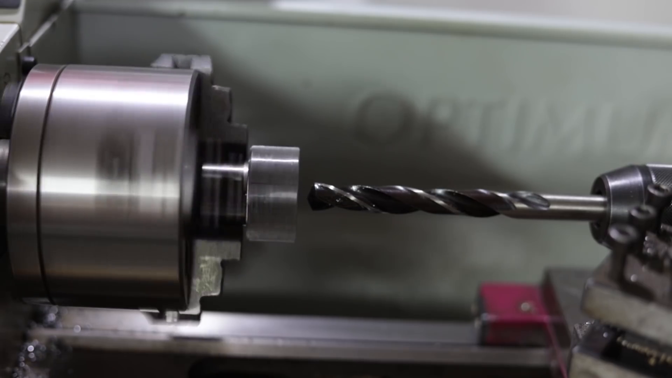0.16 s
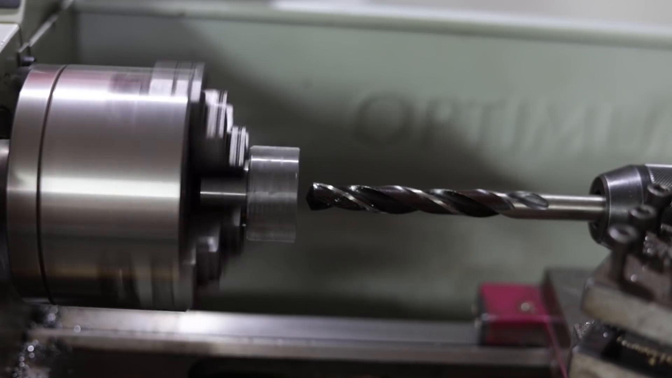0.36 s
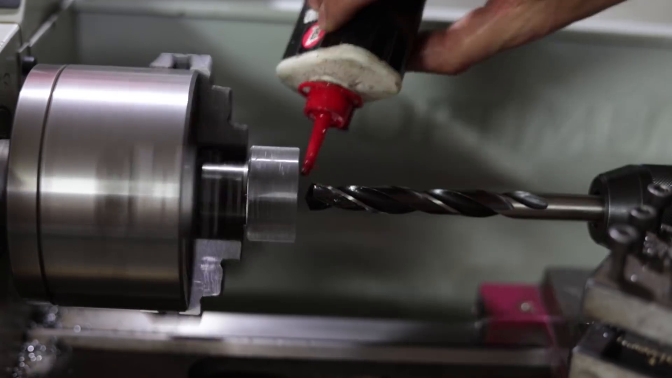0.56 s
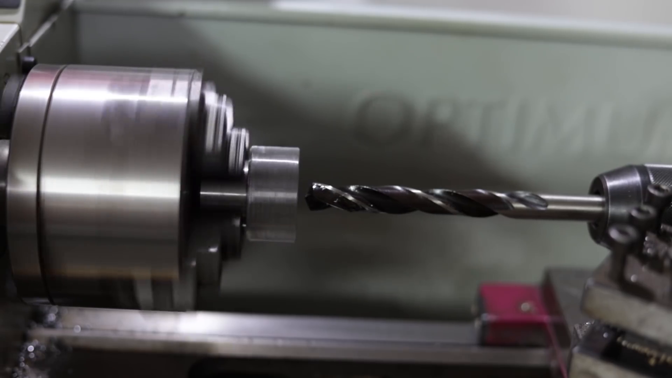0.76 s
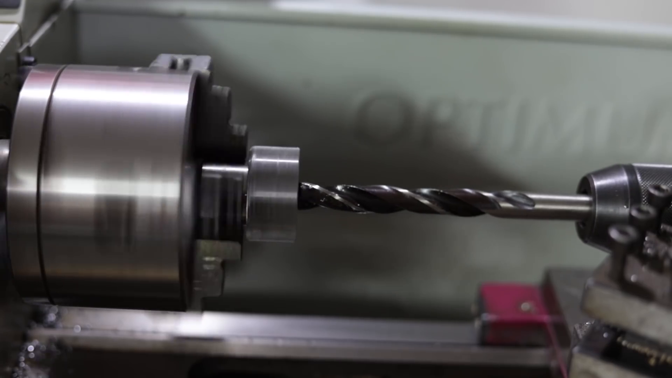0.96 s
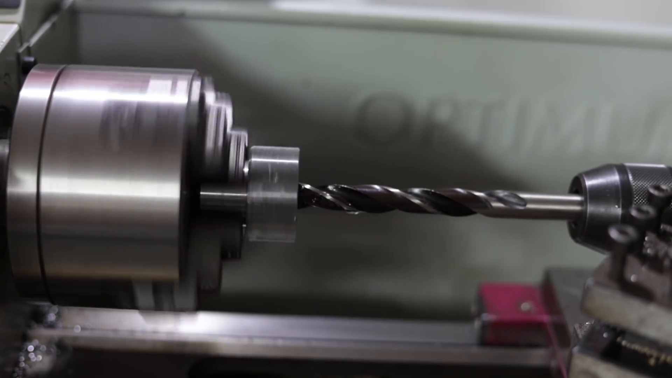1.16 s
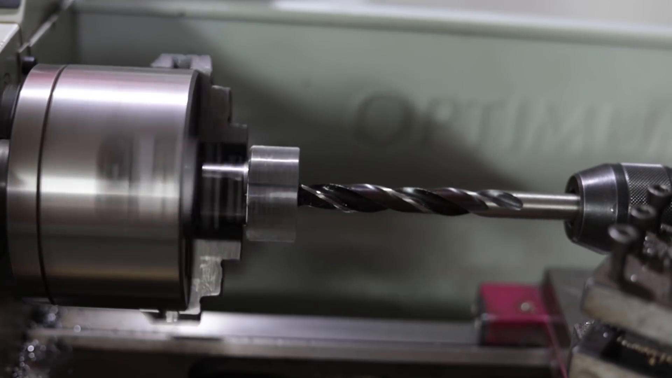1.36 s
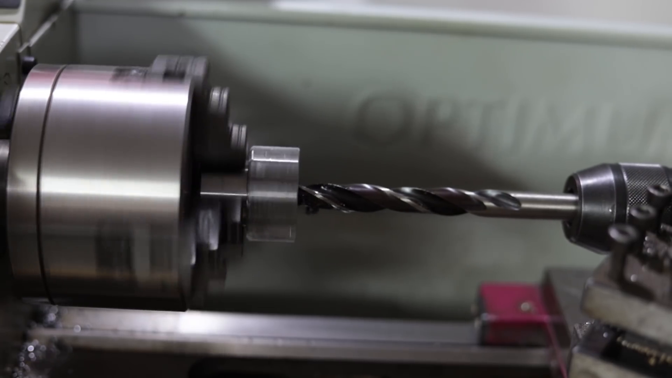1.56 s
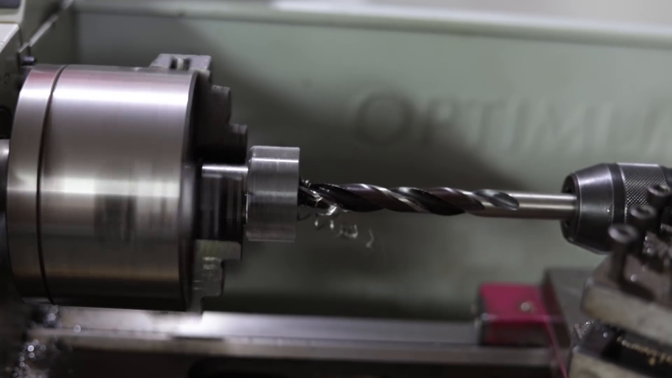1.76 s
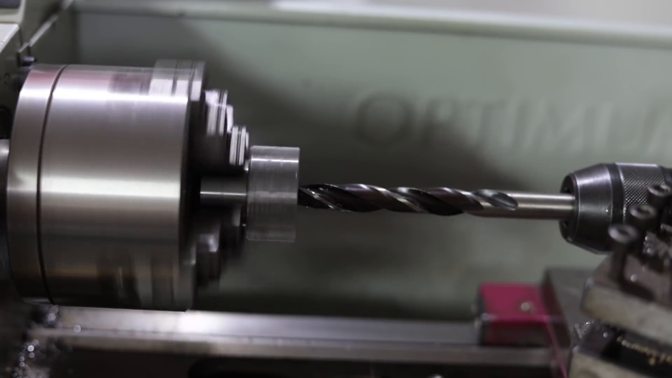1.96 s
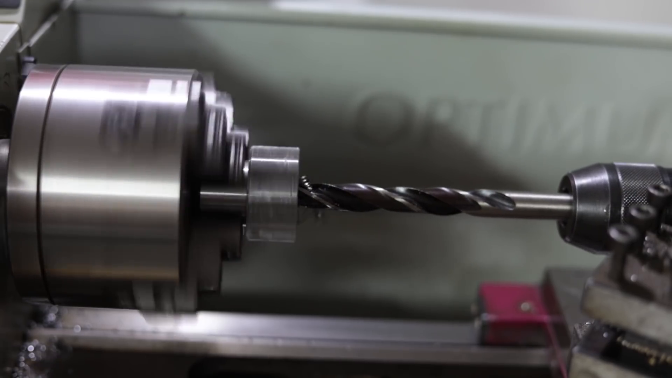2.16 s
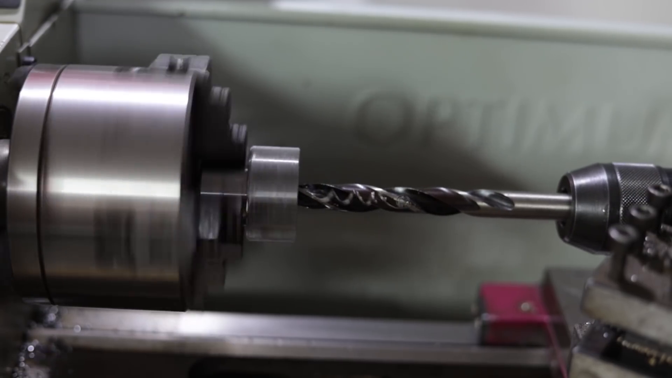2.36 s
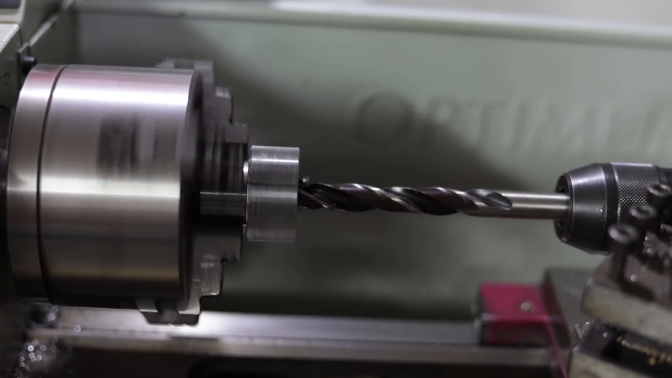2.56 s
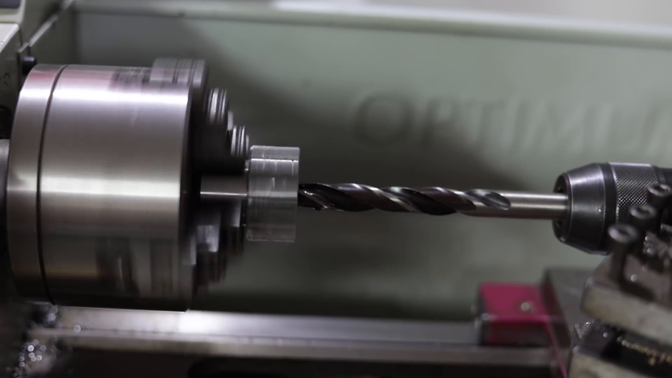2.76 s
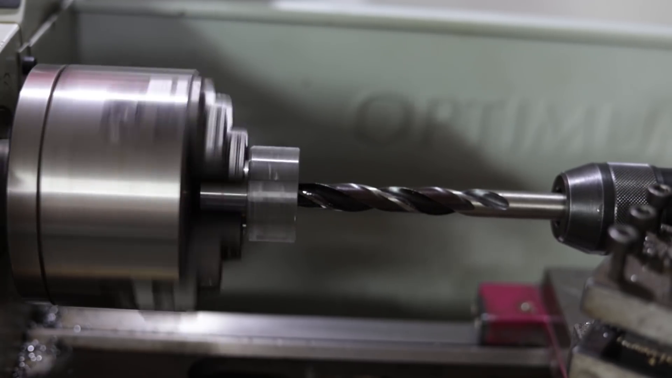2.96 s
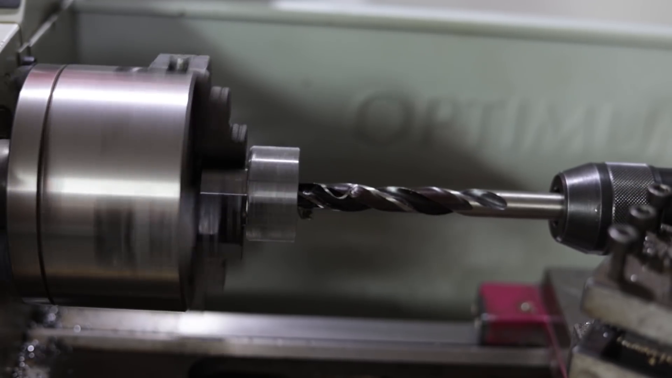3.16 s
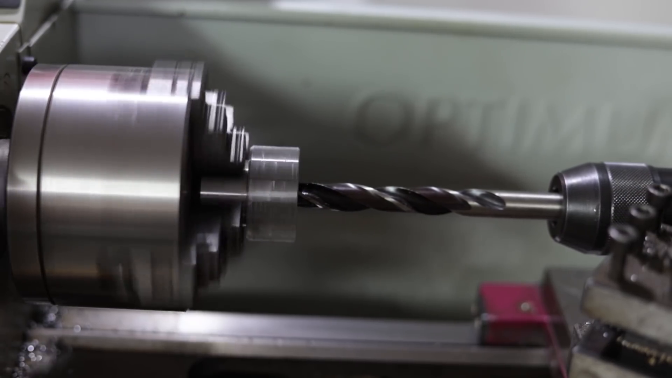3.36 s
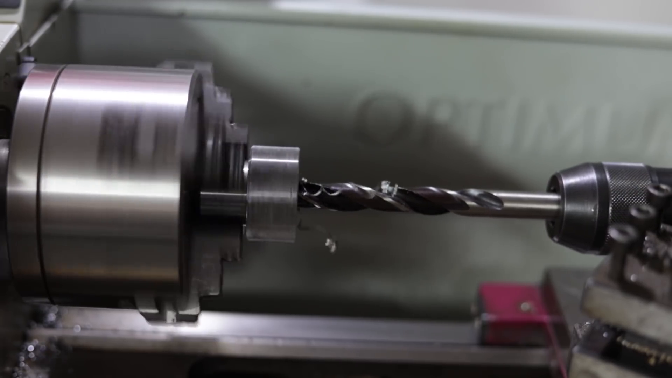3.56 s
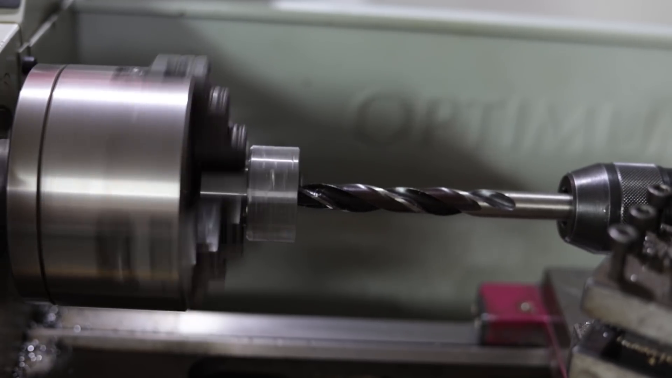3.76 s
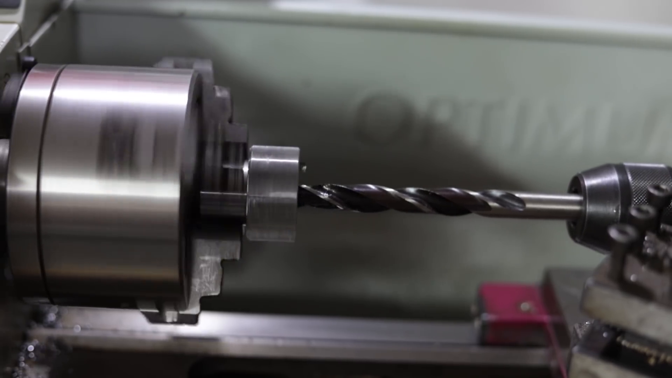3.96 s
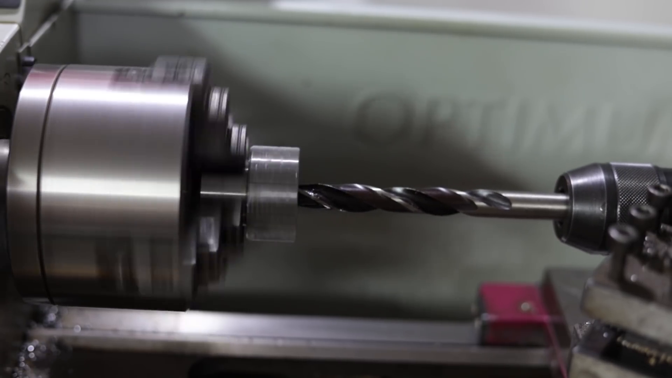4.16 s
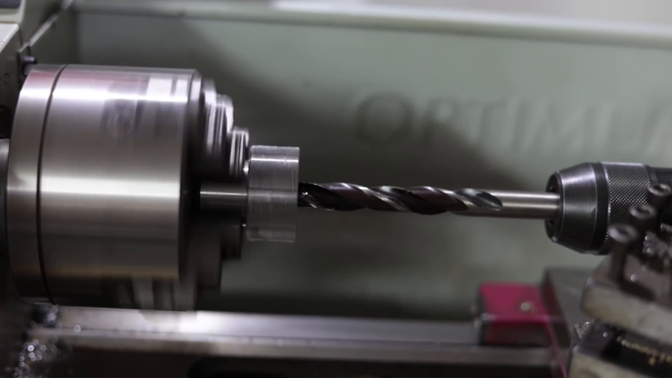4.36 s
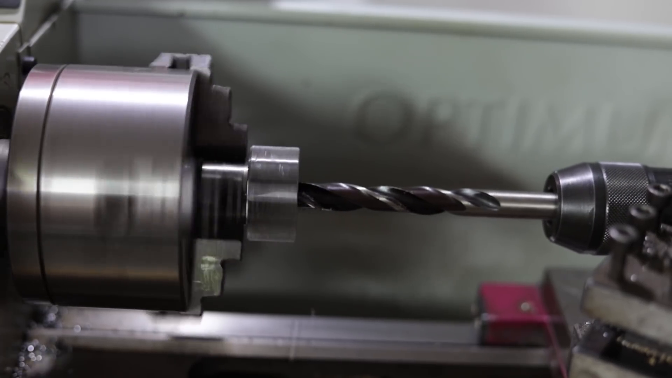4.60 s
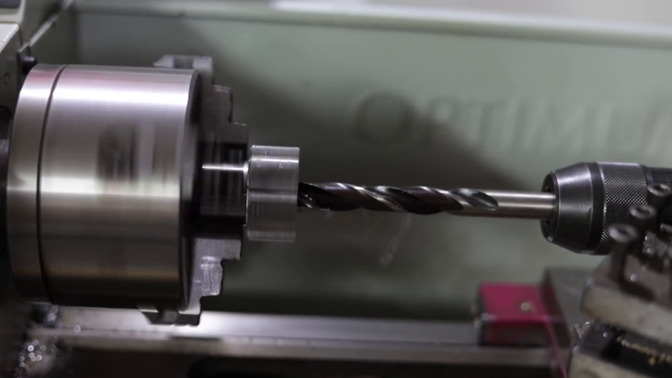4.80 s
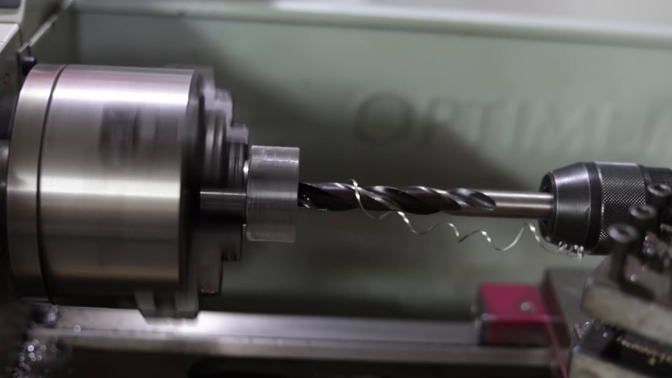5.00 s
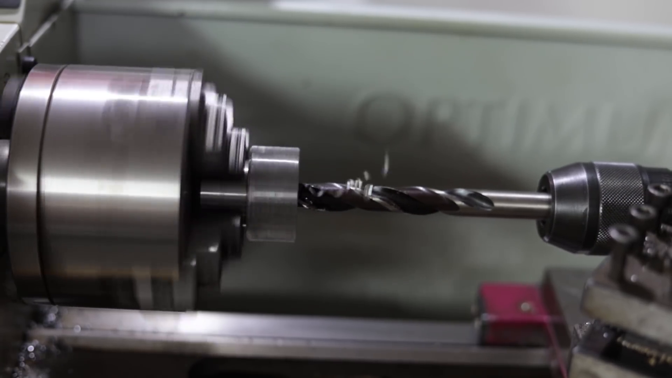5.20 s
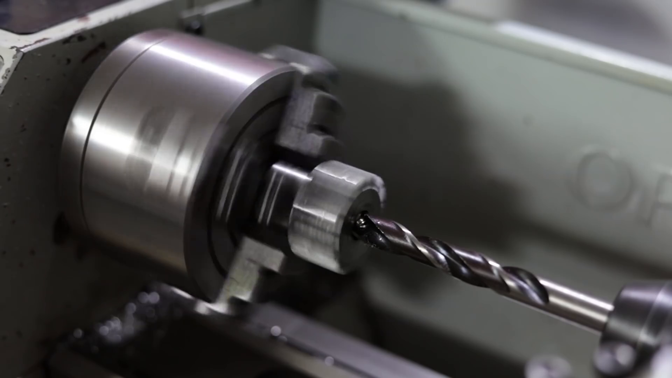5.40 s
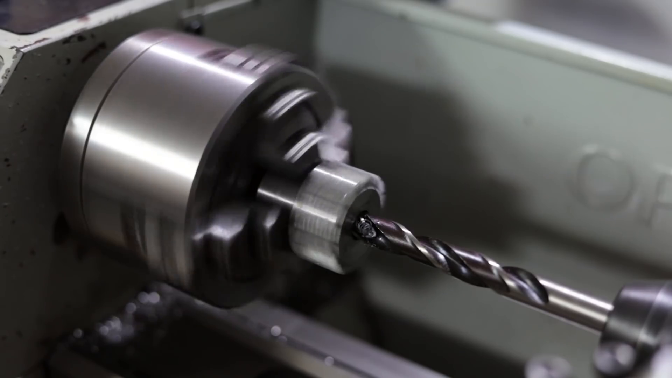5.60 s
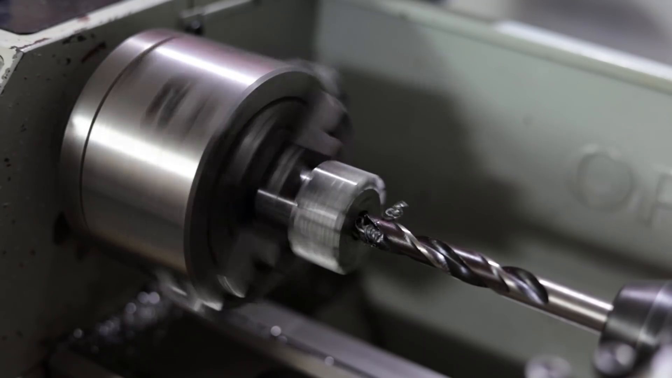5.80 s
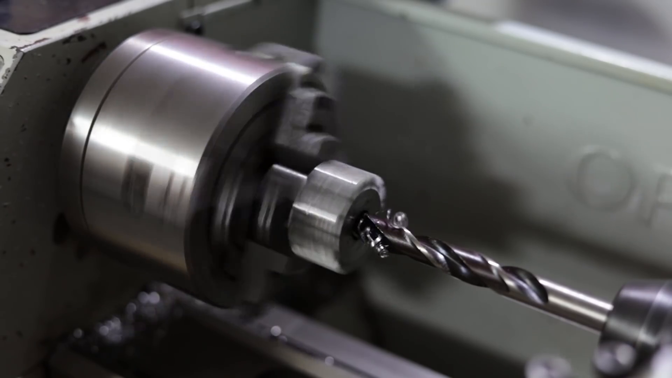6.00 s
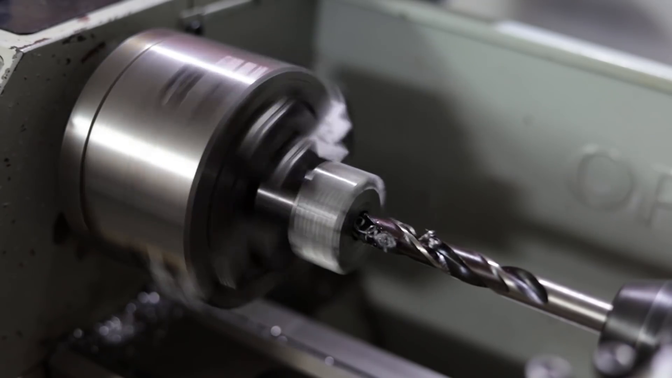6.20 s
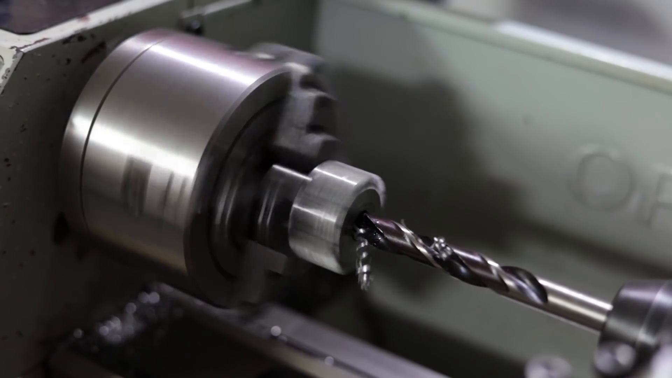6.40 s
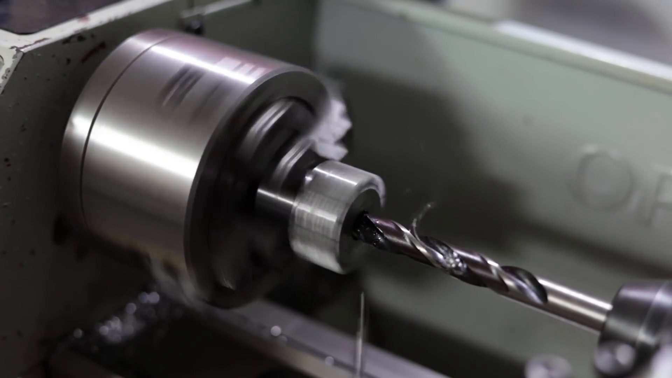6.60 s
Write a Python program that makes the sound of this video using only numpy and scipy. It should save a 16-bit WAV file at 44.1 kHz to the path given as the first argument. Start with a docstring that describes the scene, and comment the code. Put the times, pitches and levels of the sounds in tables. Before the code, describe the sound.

Thin high machine whir, harsh crackly drilling into metal twice with a brief retreat between, then abruptly a nearer low rumble with steady cutting hiss.

```python
"""A thin, high drive whine and hiss with flying chips: a small metal lathe, running free.
A twist drill, pecked in and out, then bores the work twice: gritty noise rings drill, chuck and work.
At 5.405 s a second, near scene takes over: bed rumble, cutting hiss, motor hum, inverter whistle.
Rubbing is flickering noise with grit, coloured by resonances; whine and hum are sines; chips are bursts."""
import sys
import numpy as np
from scipy import signal
from scipy.fft import rfft, irfft, next_fast_len
from scipy.io import wavfile

SR = 44100
rng = np.random.default_rng(int(sys.argv[2]) if len(sys.argv) > 2 else 0)


def generate_wav(sig):
    """Save sig (samples, or channels by samples) to the path in sys.argv[1] as 16-bit PCM at SR."""
    pcm = np.round(np.clip(np.atleast_2d(sig).T, -1, 1) * 32767).astype(np.int16)
    wavfile.write(sys.argv[1], SR, pcm)


N = 293265
T = np.arange(N) / SR
NEAR_START_S = 5.405
TOOTH_HZ, SPINDLE_HZ = 279.3, 34.5   # fast scene: belt teeth and spindle turns a second
SIDES = np.array([[1], [-1]])   # left, right

# fast scene, side against mid: [freq_hz, side_minus_mid_db]
FAST_WIDTH = [(300, -20), (800, -14), (1300, -52), (4000, -56), (4800, -12.5), (8000, -9), (15000, -6.5)]
# fast scene, balance: [freq_hz, left_minus_right_db]
FAST_BALANCE = [(500, 0), (1700, 0)]

# drill cuts; levels at the bite: [bite_s, end_s, rise_s, cut_db, ring_db]
CUTS = [(1.299, 3.687, .015, -18.5, -30), (4.389, 5.314, .045, -22, -52)]
# cut falters before it catches again: [end_s, depth_db]
FALTERS = [(1.748, 4), (2.036, 0.5), (2.964, 0.5)]
# broad colour of the cut: [freq_hz, level_db_per_hz]
CUT_AIR = [(530, -43.5), (900, -42), (1920, -15.5), (2190, -13), (2410, -19), (3620, -0.5), (4080, -10),
           (5180, -9.5), (7800, -11), (9800, -8.5), (11200, -10.5), (12500, -13.5), (13900, -9.5),
           (15000, -6.5), (15700, -16)]
# resonances of the cut: [freq_hz, width_hz, level_db]
CUT_MODES = [(2675, 36, -14), (3480, 14, -80), (3652, 68, -1.5), (4586, 110, 0.5), (5630, 69, -9)]
# resonances of the crunch at a catch: [freq_hz, width_hz, level_db]
CRUNCH_MODES = [(2120, 110, -5.5), (2350, 63, -4), (2700, 110, 4), (4420, 270, -8)]
# resonances of the grazing drill: [freq_hz, width_hz, level_db]
GRAZE_MODES = [(5620, 160, 5), (10800, 700, -1), (13500, 1100, 3)]
FALTER_S = .06
CUT_SAG_DB, CUT_SAG_S = 9, 1.9   # quietens as the hole deepens: total, time constant
CUT_WANDER_DB = 0.03
CRUNCH_DB = 2.5   # gain on cut level times root of catch strength
TREBLE_HZ, TREBLE_LOSS_PER_S = 7000, 0.069   # the deepening hole swallows treble


def cutting(caught):
    """Edges tear the metal: gritty noise rings drill, chuck and work; out of the cut the drill grazes."""
    falter_db = sum(depth_db * window(end_s - FALTER_S, end_s, FALTER_S / 2, .004)
                    for end_s, depth_db in FALTERS)
    strokes = 0
    for bite_s, end_s, rise_s, cut_db, ring_db in CUTS:
        sag_db = CUT_SAG_DB * (1 - np.exp(-np.maximum(T - bite_s, 0) / CUT_SAG_S))
        strokes = strokes + amp(cut_db - sag_db) * window(bite_s, end_s, rise_s, 0.033)
    level = amp(CUT_WANDER_DB * drift(4.3) - falter_db) * strokes

    rub = friction(1.78, 1500, -9)
    tear = body(rub, CUT_AIR, CUT_MODES, 3.1, FAST_WIDTH, FAST_BALANCE)
    treble = signal.sosfiltfilt(signal.butter(2, TREBLE_HZ, "high", fs=SR, output="sos"), tear)
    swallowed = np.clip(TREBLE_LOSS_PER_S * (T - CUTS[0][0]), 0, 1)
    tear = tear - swallowed * treble
    crunch = amp(CRUNCH_DB) * level * np.sqrt(caught) * modes_only(rub, CRUNCH_MODES)

    highpass = signal.butter(4, 4200, "high", fs=SR, output="sos")
    scrape = signal.sosfilt(highpass, modes_only(rub, GRAZE_MODES))
    turn = 2 * np.pi * SPINDLE_HZ * T - 0.45 + 0.16 * drift(1.6)
    once_a_turn = amp(6.0 * np.cos(turn) + 1.5 * np.tanh(drift(20)))
    return level * tear + crunch + grazing() * once_a_turn * scrape


# grazes of the hole on the way in or out: [start_s, end_s, start_db, end_db]
GRAZES = [(.47, .58, -34, -37), (.9, 1.32, -46, -31.5), (3.66, 3.9, -35, -58), (3.95, 4.4, -41.5, -31.5),
          (5.29, 5.41, -51, -29)]
# feed eases within a cut, load drops, chips scrape: [start_s, length_s, scrape_db]
SLIPS = [(2.037, 0.057, -24.5), (2.416, 0.054, -22.5)]
GRAZE_EDGE_S = 0.01


def grazing():
    """Strength of the scraping when the drill is not biting."""
    strokes = list(GRAZES) + [(s, s + length_s, db, db) for s, length_s, db in SLIPS]
    return sum(amp(np.interp(T, [start_s, end_s], [start_db, end_db]))
               * window(start_s, end_s, GRAZE_EDGE_S, GRAZE_EDGE_S)
               for start_s, end_s, start_db, end_db in strokes)


LOAD_RISE_S = 0.087


def load():
    """Load on the drive, 0-1: on during a cut, off during a slip."""
    cuts = sum(window(bite_s, end_s, LOAD_RISE_S, LOAD_RISE_S) for bite_s, end_s, *rest in CUTS)
    slips = sum(window(s, s + length_s, GRAZE_EDGE_S, GRAZE_EDGE_S) for s, length_s, scrape_db in SLIPS)
    return cuts * (1 - slips)


DRILL_HZ, DRILL_WANDER_HZ = 2236.5, 5.8


def drill_ring(ring, caught):
    """Lowest drill mode: a tone that wanders in phase and strength, and jumps at each catch."""
    phase = 2 * np.pi * DRILL_HZ * T + 2.06 * drift(DRILL_WANDER_HZ)
    return (ring * amp(4.5 * drift(30)) * np.sqrt(2) + caught) * np.sin(phase)


RING_FREE_DB, RING_LOADED_DB, RING_FADE_DB_PER_S = -42.5, -47, 13.5


def rubbing_ring(loaded):
    """Base strength of the drill mode: rubbing sustains it, each bite adds a fading ring."""
    rubbed = amp(RING_FREE_DB + loaded * (RING_LOADED_DB - RING_FREE_DB))
    bitten = sum(amp(ring_db - RING_FADE_DB_PER_S * (T - bite_s))
                 * window(bite_s, end_s, LOAD_RISE_S, LOAD_RISE_S)
                 for bite_s, end_s, rise_s, cut_db, ring_db in CUTS)
    return rubbed + bitten


# hardest catches of the flutes: [time_s, strike_db]
CATCHES = [(1.3214, -19), (1.3892, -22), (1.44, -25), (1.491, -23), (1.545, -11.5), (1.75, -16),
           (1.895, -16), (1.925, -12), (1.9899, -15), (2.048, -10.5), (2.145, -20), (2.2014, -24),
           (2.2642, -22), (2.428, -12.5), (2.6115, -24), (2.9322, -20), (2.9664, -14), (3.0325, -21),
           (4.3705, -21), (4.8349, -26), (5.2894, -21)]
CATCH_T60_S, CATCH_RISE_S = 0.044, 0.005
# lighter random catches: rate, level over the ring, spread
LIGHT_CATCHES_PER_S, LIGHT_CATCH_DB, LIGHT_CATCH_SPREAD_DB = 7.8, 10, 2


def catches(ring):
    """Each catch of the flutes strikes the drill mode, which jumps up and dies away."""
    light_db = LIGHT_CATCH_DB + LIGHT_CATCH_SPREAD_DB * rng.uniform(-0.85, 1, N)
    blows = ring * amp(light_db) * (rng.random(N) < LIGHT_CATCHES_PER_S / SR)
    blows[[round(s * SR) for s, strike_db in CATCHES]] = amp(np.array(CATCHES)[:, 1])
    decay = amp(-60 / (CATCH_T60_S * SR))
    blows = signal.lfilter([1], [1, -decay], blows + 1e-18)
    rise = np.exp(-1 / (CATCH_RISE_S * SR))
    return signal.lfilter([1 - rise], [1, -rise], blows)


# chips and touches of the drill: [time_s, peak_db, centre_hz]
CHIPS = [(.2294, -14, 10200), (.4768, -17.5, 7400), (.5114, -20, 11000), (.5404, -16, 4430),
         (.5506, -16.5, 6000), (1.3039, -6, 5650), (2.0376, -12, 5550), (2.4184, -6, 7000),
         (2.9667, -13, 4460), (3.032, -8.5, 6040), (3.0575, -15, 4600), (3.6581, -8, 5700),
         (4.3664, -9, 5350), (4.374, -5, 8950), (4.3874, -14, 6790), (5.2924, -9.5, 5500),
         (5.7219, -20, 9000), (6.1494, -27, 9000)]
# hard cracks, each with a very short one-sided click, as from an overload: [time_s, peak_db, push_db]
CRACKS = [(.4963, -5, -30), (1.5068, -1, -19)]
CHIP_T60_S, CHIP_RISE_S = .03, .0003
NEAR_CHIP_STRETCH = 3.2   # near chips rise and die slower
PUSH_RISE_S = 0.00011


def chips():
    """A chip is a short burst around its own pitch; a crack is wider and adds a one-sided click."""
    out, size = np.zeros((2, N + SR)), SR // 10
    every = list(CHIPS) + small_chips()
    for (s, peak_db, hz), noise in zip(every, rng.standard_normal((len(every), size))):
        at = round(s * SR)
        stretch = NEAR_CHIP_STRETCH if s > NEAR_START_S else 1
        chip = burst(noise, hz / 2.1, hz * 1.96, CHIP_T60_S * stretch, CHIP_RISE_S * stretch)
        out[:, at:at + size] += amp(peak_db) * chip

    rises = np.arange(size) / SR / PUSH_RISE_S
    push = rises * np.exp(1 - rises)
    for (s, peak_db, push_db), noise in zip(CRACKS, rng.standard_normal((len(CRACKS), size))):
        at = round(s * SR)
        crack = burst(noise, 6100, 20700, 0.015, 0.00046)
        out[:, at:at + size] += amp(peak_db) * crack + amp(push_db) * push
    return out[:, :N]


# random in a cut: rate, highest peak over the cut at its bite, pitch range
SMALL_CHIPS_PER_S, SMALL_CHIP_DB, SMALL_CHIP_HZ = 6, 9, (4000, 10000)


def small_chips():
    """Chip rows scattered through the cuts, softer as the hole deepens."""
    rows, (low_hz, high_hz) = [], SMALL_CHIP_HZ
    for bite_s, end_s, rise_s, cut_db, ring_db in CUTS:
        count = int(SMALL_CHIPS_PER_S * (end_s - bite_s))
        for when, size, pitch in rng.random((count, 3)):
            peak_db = cut_db + SMALL_CHIP_DB - 6 * size - 4 * when
            hz = low_hz * (high_hz / low_hz) ** pitch
            rows.append((bite_s + when * (end_s - bite_s), peak_db, hz))
    return rows


# drive whine: [tooth_multiple, spindle_sideband, free_db, loaded_db]
WHINE = [(2, 0, -61, -54), (2, 1, -72, -76), (3, -4, -66, -72), (3, -3, -56, -68), (3, -2, -61, -72),
         (3, -1, -61, -76), (3, 0, -54, -56), (3, 1, -58, -76), (3, 2, -65, -76), (4, -2, -66, -74),
         (4, -1, -58, -68), (4, 0, -56, -66), (4, 1, -58, -74), (4, 2, -61, -76), (5, 0, -60, -63)]
HUM_DIP_DB, HUM_DIP_S = 16, 0.028   # lowest tone drops out while the load changes


def whine(loaded):
    """Belt-tooth harmonics as sines; most spindle sidebands sink once load takes up the play."""
    dip, out = changing(), np.zeros(N)
    for multiple, sideband, free_db, loaded_db in WHINE:
        hz = multiple * TOOTH_HZ + sideband * SPINDLE_HZ
        phase = 2 * np.pi * (hz * T + rng.random())
        lowest = (multiple, sideband) == tuple(WHINE[0][:2])
        waver_db = 1.3 * drift(6) - HUM_DIP_DB * dip * lowest
        level_db = free_db + loaded * (loaded_db - free_db) + waver_db
        out += amp(level_db) * np.sqrt(2) * np.sin(phase)
    return out


def changing():
    """1 while the drill bites, slips or leaves."""
    spans = [(s, s + length_s) for s, length_s, scrape_db in SLIPS]
    for bite_s, end_s, *rest in CUTS:
        spans += [(bite_s - GRAZE_EDGE_S, bite_s + HUM_DIP_S), (end_s - HUM_DIP_S, end_s + GRAZE_EDGE_S)]
    return sum(window(start_s, end_s, GRAZE_EDGE_S, GRAZE_EDGE_S) for start_s, end_s in spans)


# broad colour of bearings and belt: [freq_hz, level_db_per_hz]
RUNNING_AIR = [(35, -80), (60, -49.5), (329, -27.5), (489, -29), (550, -21.5), (856, -17.5), (1850, -21.5),
               (2180, -4), (3020, -9), (3720, -12), (5160, -10.5), (7600, -9.5), (9300, -8.5),
               (11500, -13.5), (13400, -12), (15700, -15.5)]
# resonances of bearings and belt: [freq_hz, width_hz, level_db]
RUNNING_MODES = [(1406, 41, -17), (1690, 57, -7), (2210, 5, -28), (2830, 33, -40), (3668, 118, 0.5)]
# resonances of the slack drive: [freq_hz, width_hz, level_db]
RATTLE_MODES = [(713.5, 11, 4), (827, 28, 0.5), (1040, 82, -12.5), (1148, 83, -0.5)]
RUNNING_DB, RATTLE_DB = -30.5, -52


def running(loaded):
    """Bearings and belt throb once and twice a turn and with every tooth; the slack drive rattles."""
    turn = 2 * np.pi * SPINDLE_HZ * T + 2.55
    tooth = 2 * np.pi * TOOTH_HZ * T
    throb_db = 1.1 * np.cos(turn) + 0.43 * np.cos(2 * turn) + 2.7 * np.cos(tooth)
    rub = amp(throb_db) * friction(1.47, 900, -3.6)
    slack = 1 - 0.25 * loaded
    rattle = amp(RATTLE_DB) * slack * modes_only(rub, RATTLE_MODES)
    bearings = body(rub, RUNNING_AIR, RUNNING_MODES, 4.6, FAST_WIDTH, FAST_BALANCE)
    return amp(RUNNING_DB) * bearings + rattle


# near levels over time: [time_s, rumble_db, hiss_db]
NEAR_LEVELS = [(5.405, -21, -31.5), (5.75, -20, -30), (6.08, -20, -31.5), (6.15, -18.5, -31.5),
               (6.3, -20, -28.5), (6.5, -17, -31.5), (6.65, -19, -28)]
# motor and inverter tones: [freq_hz, level_db]
MOTOR_TONES = [(55.9, -51.5), (83.5, -55), (139, -57), (167.9, -47.5), (223.4, -37), (9952, -42.5),
               (9979, -40.5), (9998.6, -52), (10045, -66), (10130, -44.5), (10160, -61)]
# broad colour of the bed: [freq_hz, level_db_per_hz]
BED_AIR = [(18, -62), (30, -45), (216, -14.5), (278, -9), (366, -1), (530, -42), (784, -16), (1410, -16.5),
           (2120, -17.5), (3200, -31), (4160, -47), (7040, -120)]
# resonances of bed and guard: [freq_hz, width_hz, level_db]
BED_MODES = [(334.5, 16, -2.5), (375, 13.3, 6), (463, 37, -7), (570, 36, -8), (702, 148, -9.5),
             (797, 64, -4), (866, 56, -8), (1013, 53, -8), (1559, 19, -6), (1713, 36, -12), (2060, 48, -12),
             (2194, 69, -9.5), (2417, 79, -17.5), (2660, 24, -11.5)]
# broad colour of the near cutting hiss: [freq_hz, level_db_per_hz]
HISS_AIR = [(1530, -19), (2600, -15), (3520, -4.5), (4330, -2.5), (6190, -13), (7370, 1.5), (9400, -29),
            (9690, -19), (10400, -30), (10600, -14), (16000, -33)]
# resonances of the near cutting hiss: [freq_hz, width_hz, level_db]
HISS_MODES = [(4350, 55, 3), (4980, 200, 1.5), (6970, 250, -5.5), (8250, 160, -1.5), (10080, 89, 1.5),
              (11000, 66, -22)]
# near scene, side against mid: [freq_hz, side_minus_mid_db]
NEAR_WIDTH = [(60, -18), (130, -34), (290, -19), (640, -11.5), (1410, -5.5), (3100, -1), (6820, -0.5),
              (15000, 4)]
# near scene, balance: [freq_hz, left_minus_right_db]
NEAR_BALANCE = [(60, 9), (180, -4), (550, 1.5), (1650, -1), (4970, -2), (15000, -5)]


def near_machine():
    """Rumble in the modes of bed and guard, cutting hiss above it, motor and inverter tones."""
    rumble_db, hiss_db = in_time(NEAR_LEVELS)
    rub = friction(0.59, 500, -8.5)
    rumble = body(rub * amp(1.2 * drift(11)), BED_AIR, BED_MODES, 3.4, NEAR_WIDTH, NEAR_BALANCE)
    hiss = body(rub * amp(1.65 * drift(7)), HISS_AIR, HISS_MODES, 2.6, NEAR_WIDTH, NEAR_BALANCE)
    tones = 0
    for hz, level_db in MOTOR_TONES:
        apart = np.arctan(amp(at_hz(NEAR_WIDTH, hz))) * SIDES   # phase offset of each side
        level = amp(level_db + 1.3 * drift(16)) * np.sqrt(2)
        tones = tones + level * np.sin(2 * np.pi * hz * T + 0.81 * drift(7.7) + apart)
    return (T > NEAR_START_S) * (amp(rumble_db) * rumble + amp(hiss_db) * hiss + tones)


def friction(flicker_db, grit_per_s, grit_db):
    """Rubbing metal: mid and side noise whose bands flicker, partly in step, plus sharp grit."""
    out, together = 0, drift(25)
    white = rng.standard_normal((2, 2, N))
    for k, low_hz in enumerate(32 * 2. ** np.arange(0, 9.1, .7)):
        edges_hz = [low_hz, min(low_hz * 2 ** .7, .45 * SR)]
        # neighbouring bands take independent noise
        band = signal.sosfilt(signal.butter(2, edges_hz, "band", fs=SR, output="sos"), white[k % 2])
        out = out + amp(flicker_db * (0.26 * together + drift(60))) * band
    sizes = amp(2.8 * np.minimum(rng.exponential(1, N), 4)) * rng.choice([-1, 1], (2, N))
    grit = sizes * (rng.random(N) < grit_per_s * amp(5.0 * together) / SR)   # rate swells with the flicker
    return rms_one(out) + amp(grit_db) * rms_one(grit)


def body(x, air, modes, modes_db, width, balance):
    """Broad colour parallel to resonances of alternating sign; mid/side to left/right; rms 1."""
    size = next_fast_len(N + SR // 4)
    hz = np.maximum(np.arange(size // 2 + 1) * SR / size, 1)
    colour = amp(at_hz(air, hz)) + 0j
    for k, (centre_hz, width_hz, level_db) in enumerate(modes):
        detune = (hz - centre_hz ** 2 / hz) / width_hz
        colour += (-1) ** k * amp(level_db + modes_db) / (1 + 1j * detune)
    mid, side = rfft(x, size) * colour
    both = mid + SIDES * side * amp(at_hz(width, hz))
    both = both * amp(SIDES * at_hz(balance, hz) / 2)
    return rms_one(irfft(both, size)[:, :N])


def modes_only(x, modes):
    """Fast-scene part with resonances and a negligible broad colour."""
    return body(x, [(30, -90), (20000, -90)], modes, 0, FAST_WIDTH, FAST_BALANCE)


def burst(noise, low_hz, high_hz, t60_s, rise_s):
    """Noise that rises fast and dies, in one band; peak 1."""
    t = np.arange(noise.shape[-1]) / SR
    band = signal.butter(2, [low_hz, min(high_hz, .45 * SR)], "band", fs=SR, output="sos")
    out = signal.sosfilt(band, noise * amp(-60 * t / t60_s) * np.minimum(t / rise_s, 1))
    return out / np.abs(out).max()


def drift(rate_hz):
    """Slow chance: noise twice through a one-pole low-pass; spread 1."""
    step = 40   # samples per slow point
    r = np.exp(-2 * np.pi * rate_hz * step / SR)
    noise = rng.standard_normal(N // step + 2002)
    slow = signal.lfilter([1], [1, -2 * r, r * r], noise)[2000:]   # settled part
    return np.interp(np.arange(N) / step, np.arange(len(slow)), rms_one(slow))


def window(start_s, end_s, rise_s, fall_s):
    """Rises to 1 from the start, holds, is back at 0 by the end."""
    corners_s = np.maximum.accumulate([start_s, start_s + rise_s, end_s - fall_s, end_s])
    return np.interp(T, corners_s, [0, 1, 1, 0])


def in_time(rows):
    """Each column of a curve at every sample."""
    s, *columns = np.transpose(rows)
    return [np.interp(T, s, column) for column in columns]


def at_hz(points, hz):
    """A spectrum read on a log-frequency axis."""
    points_hz, points_db = np.transpose(points)
    return np.interp(np.log(hz), np.log(points_hz), points_db)


def amp(db):
    """dB to gain."""
    return np.exp(np.asarray(db) * (np.log(10) / 20))


def rms_one(x):
    """Scaled to rms 1."""
    return x / np.sqrt(np.mean(x ** 2) + 1e-20)


def scene():
    """The fast scene, then the near one; chips fly in both."""
    loaded = load()
    ring = rubbing_ring(loaded)
    caught = catches(ring)
    fast = cutting(caught) + drill_ring(ring, caught) + whine(loaded) + running(loaded)
    return fast * (T <= NEAR_START_S) + near_machine() + chips()


def record(dry):
    """Gain control ducks just after a loud peak and recovers; the peak itself clips; the top is cut."""
    knee_db, duck_db_per_db = -4.0, 4.0
    release_db_per_s, attack_s, cutoff_hz = 420, .0015, 15730
    peak_db = 20 * np.log10(np.abs(dry).max(axis=0) + 1e-9)
    over_db = duck_db_per_db * np.maximum(peak_db - knee_db, 0)
    # jumps with each peak, then falls at the release rate
    held_db = np.maximum.accumulate(over_db + release_db_per_s * T) - release_db_per_s * T
    r = np.exp(-1 / (attack_s * SR))
    duck_db = signal.lfilter([1 - r], [1, -r], held_db)
    clipped = np.clip(dry * amp(-duck_db), -.95, .95)
    return signal.sosfilt(signal.ellip(12, .5, 80, cutoff_hz, fs=SR, output="sos"), clipped)


dry = scene()
out = record(dry)
generate_wav(out)
```